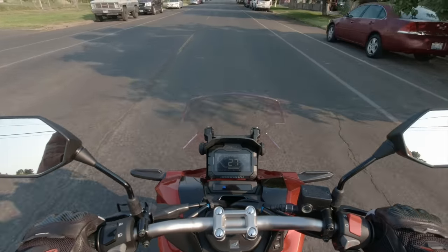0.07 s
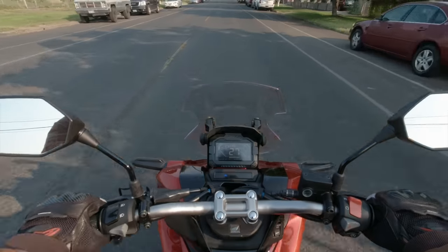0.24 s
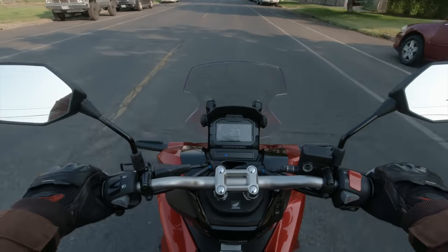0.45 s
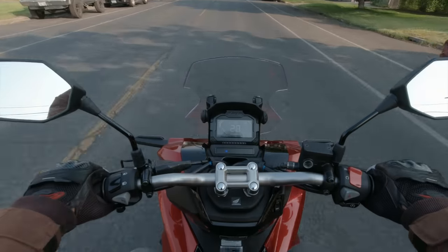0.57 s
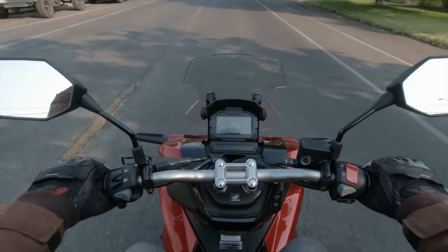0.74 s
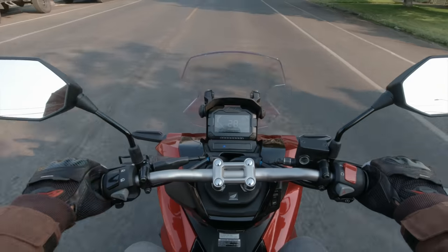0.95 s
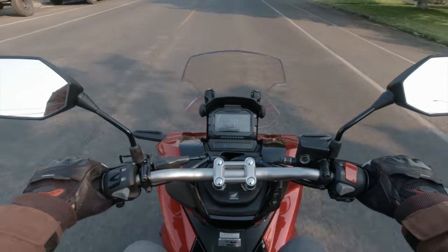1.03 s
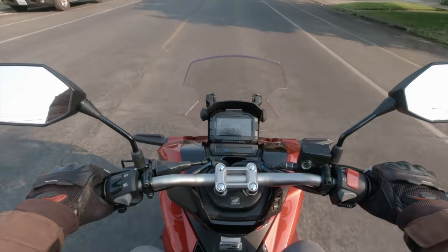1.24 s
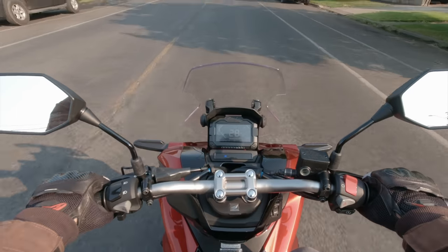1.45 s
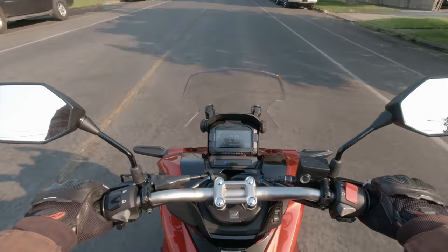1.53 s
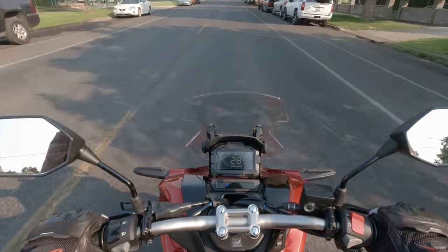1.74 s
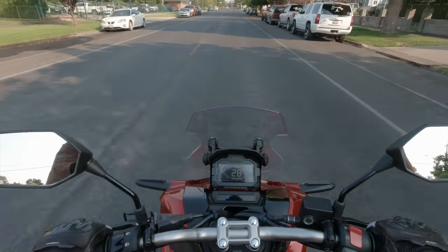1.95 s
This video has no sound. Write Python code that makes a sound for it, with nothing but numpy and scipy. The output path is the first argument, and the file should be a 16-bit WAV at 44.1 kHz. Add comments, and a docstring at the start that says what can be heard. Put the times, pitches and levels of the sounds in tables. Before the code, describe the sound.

Gusty wind rumble on a moving scooter, with road noise and a faint, steady engine.

```python
"""Wind buffets the microphone at the chest of a rider cruising along a street on a small scooter.
Its turbulent pressure fluctuations rumble over the broadband roar of tyres and air. The periodic
firing of the single-cylinder engine hums faintly through as a harmonic series. The bodywork gives
a few faint ticks, and near the end a small bump sets the frame ringing with a low thud."""
import sys
import numpy as np
from scipy import signal
from scipy.io import wavfile
from scipy.ndimage import uniform_filter1d

SR = 44100
rng = np.random.default_rng(int(sys.argv[2]) if len(sys.argv) > 2 else 0)


def transcribe(signal):
    """Save signal, clipped to [-1, 1], as a 16-bit WAV file at the path in sys.argv[1]."""
    frames = np.atleast_2d(signal).T
    limited = np.clip(frames, -1, 1)
    pcm = np.round(limited * 32767).astype(np.int16)
    wavfile.write(sys.argv[1], SR, pcm)


N = 88200

# Gust levels of the wind layers (time [s], thump [dB], buffet [dB], flutter [dB], moan [dB])
GUST_LEVELS = [(0.02, -42, -33.5, -41.5, -54), (0.074, -27.5, -47.5, -44, -56.5),
               (0.112, -34.5, -48, -42.5, -46), (0.21, -42, -41, -41.5, -48.5),
               (0.238, -40, -56, -46.5, -47.5), (0.27, -42.5, -41, -40.5, -53.5),
               (0.39, -33, -38, -41.5, -44), (0.44, -34.5, -32, -36.5, -50.5),
               (0.472, -45, -41, -44, -42.5), (0.5, -37, -41, -37, -46.5), (0.576, -43, -38, -44.5, -53.5),
               (0.608, -34, -41, -46.5, -40.5), (0.642, -37.5, -40, -43.5, -49), (0.68, -41, -32, -44, -42),
               (0.734, -34.5, -38, -31, -43), (0.756, -25.5, -38, -36, -44.5), (0.788, -33, -43, -40, -43),
               (0.81, -39, -45, -40, -40), (0.87, -40.5, -35, -36, -45),
               (0.968, -35.5, -45.5, -40.5, -43.5), (0.99, -38.5, -50, -38.5, -38.5),
               (1.018, -29, -30.5, -42, -48.5), (1.056, -33.5, -39.5, -47, -42.5),
               (1.106, -48, -29, -34, -44.5), (1.144, -40, -36.5, -42, -43.5),
               (1.252, -41, -51, -38.5, -42.5), (1.28, -39, -38, -40.5, -43), (1.4, -38, -48, -37.5, -46),
               (1.454, -47, -35, -37.5, -41.5), (1.504, -39, -34.5, -36, -41),
               (1.57, -33.5, -43.5, -36.5, -39), (1.608, -33, -40, -34, -45),
               (1.63, -30, -48, -36.5, -45.5), (1.7, -33, -35.5, -35.5, -39),
               (1.756, -29, -38.5, -35, -47.5), (1.788, -40, -47, -33.5, -36.5),
               (1.832, -32, -34, -40, -41.5), (1.892, -34, -40, -31, -38),
               (1.918, -37.5, -32, -31.5, -48.5), (1.98, -58, -39, -28, -41.5)]
# Spectra of the wind layers (frequency [Hz], relative density [dB])
THUMP_SPECTRUM = [(4, -18), (14, 7), (27, 9), (40, 8), (52, -11), (90, -39)]
BUFFET_SPECTRUM = [(22, -17), (42, -10), (60, 4.5), (90, -4.5), (120, -15.5), (200, -50.5)]
FLUTTER_SPECTRUM = [(50, -34.5), (95, 1), (130, 2), (200, -0.5), (250, -15), (400, -46)]
MOAN_SPECTRUM = [(150, -23), (230, -2.5), (300, -3.5), (335, -8.5), (400, -10), (520, -20.5), (800, -37.5)]
# Single knocks of wind (time [s], peak level [dB], frequency [Hz])
WIND_KNOCKS = [(.295, -29.5, 85), (1.128, -32, 69)]
# Tyre and air noise (time [s], roar level [dB], hiss level [dB])
ROAD_LEVELS = [(0.02, -54.5, -70), (0.358, -56.5, -70), (0.45, -53, -68.5), (0.488, -54.5, -66.5),
               (0.592, -55.5, -69), (0.706, -53.5, -69), (0.728, -51.5, -63), (0.806, -54, -68.5),
               (0.832, -53.5, -67), (1.062, -53, -67), (1.084, -56, -69.5), (1.128, -54, -63),
               (1.138, -51.5, -69.5), (1.192, -56, -69), (1.204, -52.5, -66.5), (1.252, -54.5, -67.5),
               (1.444, -51.5, -66), (1.488, -51.5, -64), (1.592, -50, -64.5), (1.596, -51.5, -66),
               (1.826, -51.5, -65.5), (1.968, -53.5, -66.5), (1.98, -50.5, -67.5)]
# Airy treble (time [s], level [dB])
AIR_LEVELS = [(0.03, -88), (0.732, -89.5), (0.958, -86), (1.262, -87.5), (1.97, -86)]
# Spectra of the tyre and air noise and the swish (frequency [Hz], relative density [dB])
ROAR_SPECTRUM = [(300, -15), (500, 0.5), (700, -4), (1000, -4), (1500, -6.5), (2000, -12.5), (2500, -36.5),
                 (3500, -46.5)]
HISS_SPECTRUM = [(1300, -19.5), (2100, -2.5), (2700, -4), (3500, -13), (4300, -17.5), (5300, -21),
                 (6300, -28), (8000, -62.5)]
AIR_SPECTRUM = [(4000, -25.5), (5800, -6.5), (7000, -3), (9000, -7.5), (11000, -10.5), (12800, -14.5)]
SWISH_SPECTRUM = [(1000, -30), (1500, 2.5), (1900, 11), (2300, -6.5), (3200, -14), (5500, -17.5),
                  (6200, -63.5)]
# Engine speed (time [s], firing rate [Hz])
FIRING_RATE = [(0, 38.65), (.5, 38.75), (1.0, 38.95), (1.5, 38.75), (2, 38.85)]
# Exhaust note (multiple of the firing rate [-], level before waver and effort [dB])
EXHAUST_HARMONICS = [(1, -47), (2, -47), (5, -52), (6, -56), (7, -56), (8, -51), (9, -63), (11, -57),
                     (13, -68), (16, -70), (17, -72), (18, -71), (19, -72), (20, -74), (23, -74), (24, -66),
                     (27, -77), (28, -74), (32, -77), (34, -75)]
# Engine effort (time [s], gain [dB])
ENGINE_EFFORT = [(0, 0.5), (.35, -6), (.5, 2), (1, 0.5), (1.3, 1.5), (1.55, 4), (1.7, 1), (2, 4)]
# Bodywork ticks (time [s], peak level per partial [dB], centre frequency [Hz])
BODY_TICKS = [(.5415, -78, 8000), (.6195, -78, 7200), (.754, -76, 5000), (1.9065, -77, 8600),
              (1.9132, -75, 10000), (1.948, -80, 10200)]


def wind(steadiness=0.71):
    """Turbulence: pressure fluctuates at the microphone in four bands, each gusting on its own."""
    layers = (THUMP_SPECTRUM, 16384), (BUFFET_SPECTRUM, 8192), (FLUTTER_SPECTRUM, 4096), (MOAN_SPECTRUM, 2048)
    out = np.zeros(N)
    for column, (spectrum, size) in enumerate(layers, start=1):
        band = noise(spectrum, size, patchy_db=0.43)
        envelope = uniform_filter1d(abs(signal.hilbert(band)), size=size // 8)
        # Partly flatten the random swells, so that the gusts set the level.
        steady = unit_rms(band / envelope ** steadiness)
        out += gain_of(curve(GUST_LEVELS, column)) * steady
    return out


def wind_knocks(half_width_s=.009):
    """Pressure transients: each knock of wind is a brief rarefaction, about one cycle long."""
    t, out = np.arange(N) / SR, np.zeros(N)
    for at, db, hz in WIND_KNOCKS:
        out -= gain_of(db) * gaussian(at, half_width_s) * np.cos(2 * np.pi * hz * (t - at))
    return out


def tyres_and_air(firings, throb_depth=0.045):
    """Amplitude modulation: the broadband noise of tyres and air throbs slightly at the firing rate."""
    roar = gain_of(curve(ROAD_LEVELS)) * noise(ROAR_SPECTRUM, size=1024, patchy_db=0.34)
    hiss = gain_of(curve(ROAD_LEVELS, column=2)) * noise(HISS_SPECTRUM, size=512, patchy_db=0.9)
    air = gain_of(curve(AIR_LEVELS)) * noise(AIR_SPECTRUM, size=512, patchy_db=1.5)
    return (roar + hiss + air) * (1 + throb_depth * np.cos(2 * np.pi * firings))


def engine(firings, waver_db=2.5):
    """Fourier series: periodic exhaust pulses give harmonics of the firing rate, each wavering in level."""
    t, out = np.arange(N) / SR, np.zeros(N)
    wavers = rng.standard_normal((len(EXHAUST_HARMONICS), 24))
    phases = rng.random(len(EXHAUST_HARMONICS))
    for (multiple, db), waver, phase in zip(EXHAUST_HARMONICS, wavers, phases):
        drift = np.interp(t, np.linspace(0, N / SR, len(waver)), waver)
        out += gain_of(db + waver_db * drift) * np.cos(2 * np.pi * (multiple * firings + phase))
    return gain_of(curve(ENGINE_EFFORT)) * out


def frame_thud(start_s=1.895, level_db=-26.5, hz=127, sag_hz_per_s=220, rise_s=.04, t60_s=.4):
    """Damped vibration: after a bump the frame rings with a weaker octave above, sagging in pitch."""
    age = np.maximum(np.arange(N) / SR - start_s, 0)
    phase = 2 * np.pi * (hz - sag_hz_per_s * age / 2) * age
    attack = np.minimum(age / rise_s, 1)
    decay = gain_of(level_db - 60 * np.maximum(age - rise_s, 0) / t60_s)
    return attack * decay * (np.sin(phase) + gain_of(-11.5) * np.sin(2 * phase))


def swish(level_db=-61):
    """Band-limited noise: a smooth, short burst near 1.9 kHz is heard as a swish."""
    envelope = gain_of(level_db) * gaussian(at_s=.742, half_width_s=.028)
    return envelope * noise(SWISH_SPECTRUM, size=512, patchy_db=0)


def bodywork_ticks(half_width_s=.0006, spread=.16):
    """Time-bandwidth trade-off: three inharmonic partials sound so briefly that they blur into a tick."""
    t, out = np.arange(N) / SR, np.zeros(N)
    for at, db, hz in BODY_TICKS:
        offsets = np.arange(-1, 2) + rng.uniform(-1, 1, 3) / 3
        ring = sum(np.sin(2 * np.pi * f * (t - at)) for f in hz * (1 + spread * offsets))
        out += gain_of(db) * gaussian(at, half_width_s) * ring
    return out


def noise(spectrum, size, patchy_db):
    """Spectral shaping: random short-time spectra with drifting patches of level give unit-RMS noise."""
    frames, hz = 4 * N // size + 5, np.fft.rfftfreq(size, 1 / SR)
    real, imag, patches = rng.standard_normal((frames, size // 2 + 1, 3)).T
    patches = uniform_filter1d(patches, size=10, axis=0)  # across frequency
    patches = unit_rms(uniform_filter1d(patches, size=8, axis=1))  # across time
    knot_hz, knot_db = np.transpose(spectrum)
    shape_db = np.interp(np.log(hz + 1), np.log(knot_hz + 1), knot_db, left=-120, right=-120)
    spectra = (real + 1j * imag) * gain_of(shape_db[:, None] + patchy_db * patches)
    return unit_rms(signal.istft(spectra, nperseg=size, noverlap=3 * size // 4)[1][:N])


def gaussian(at_s, half_width_s):
    return np.exp(-((np.arange(N) / SR - at_s) / half_width_s) ** 2)


def gain_of(db):
    return 10 ** (np.asarray(db) / 20)


def unit_rms(x):
    return x / np.sqrt(np.mean(x ** 2) + 1e-20)


def curve(table, column=1):
    rows = np.array(table)
    return np.interp(np.arange(N) / SR, rows[:, 0], rows[:, column])


def scene():
    """Superposition: the pressures of all sources add in one channel."""
    firings = np.cumsum(curve(FIRING_RATE)) / SR  # phase in cycles
    cruising = engine(firings) + wind() + wind_knocks() + tyres_and_air(firings)
    return (cruising + swish() + frame_thud() + bodywork_ticks())[None]


def record(dry):
    """Band limiting: a linear-phase low-pass filter removes the treble above 12.75 kHz."""
    lowpass = signal.firwin(511, 12750, window=("kaiser", 9), fs=SR)
    return signal.oaconvolve(dry, lowpass[None], "same")


dry = scene()
out = record(dry)
transcribe(out)
```